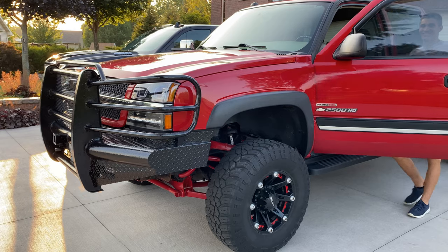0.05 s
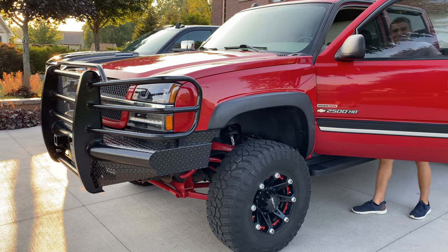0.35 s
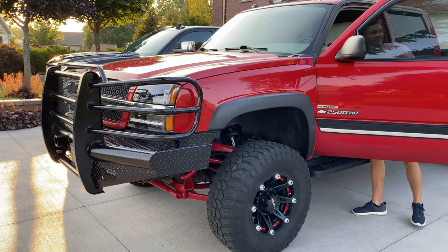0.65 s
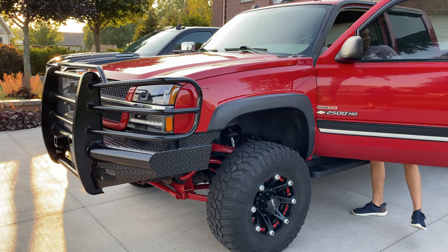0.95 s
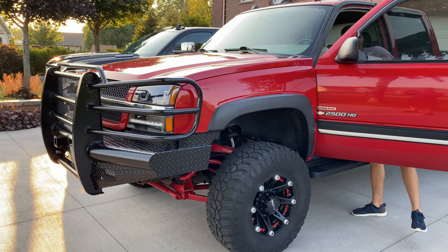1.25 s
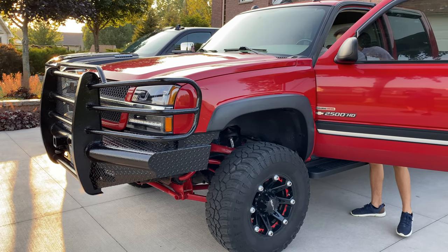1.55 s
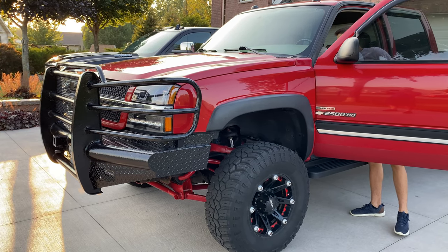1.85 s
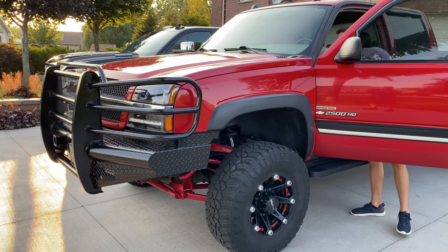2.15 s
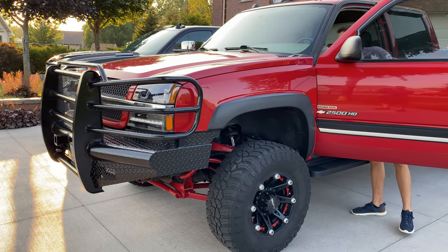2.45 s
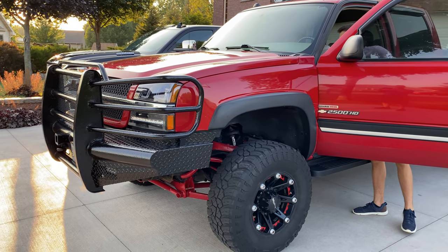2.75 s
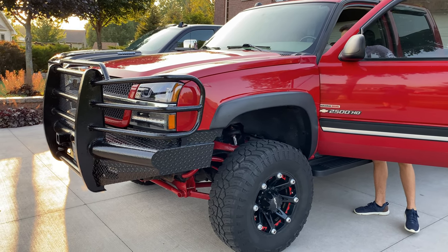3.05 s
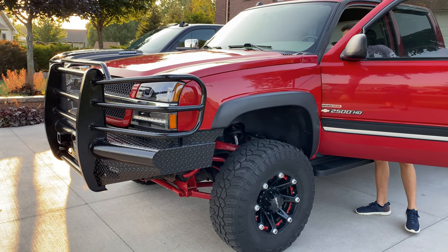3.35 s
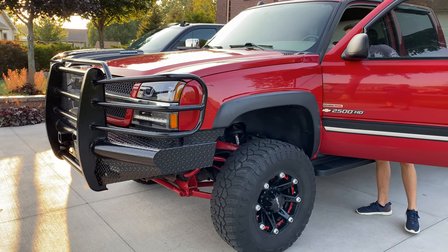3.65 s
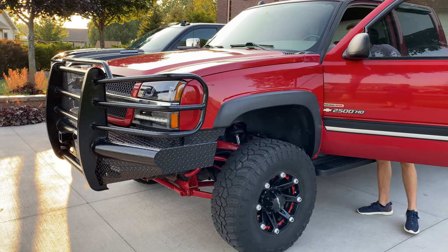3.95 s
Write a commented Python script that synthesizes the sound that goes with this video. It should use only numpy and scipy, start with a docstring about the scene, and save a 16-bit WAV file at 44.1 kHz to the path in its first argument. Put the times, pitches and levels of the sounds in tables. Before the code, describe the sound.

A diesel pickup's starter cranks loudly, but only at the end. First, a quiet driveway with faint bird chirps and distant traffic. Shoes scuff around 0.4 seconds, soft cab bumps follow from 1.3, and keys click near 1.9. A relay clicks at 2.2, a pump whirs briefly at 2.5, then a light breeze puffs. At 3.8 the starter clunks in, clattering and whining, still cranking at 4.

```python
"""A diesel pickup's starter slams into gear and cranks the engine, just before the end.
Its teeth clatter and ring the engine block; the gear growl and motor whine sag on the first
compression and race on after it. Before that, someone steps up to the truck, keys click and a pump
whirs briefly. Behind it all is a quiet driveway with a small bird, a breeze and distant traffic."""
import sys
import numpy as np
from scipy import signal
from scipy.fft import rfft, irfft
from scipy.io import wavfile

SR = 44100
rng = np.random.default_rng(int(sys.argv[2]) if len(sys.argv) > 2 else 0)


def int16_out(signal):
    """Quantize to a 16-bit WAV file."""
    q = np.round(np.clip(np.atleast_2d(signal).T, -1, 1) * 32767)
    wavfile.write(sys.argv[1], SR, q.astype(np.int16))


N = 176400
TIME = np.arange(N) / SR


# The starter's small gear hits the engine's big one. Each row: start in seconds, levels of the ring,
# the crack and the clunk in dB, rise and fade times in seconds.
GEAR_HITS = [(3.768, -24.5, -19.5, -41, 0.0042, 0.019), (3.784, -19.5, -18.5, -16.5, 0.0049, 0.0083),
             (3.809, -27.5, -38, -35, 0.0042, 0.017), (3.939, -24, -33, -32, 0.0043, 0.0077),
             (3.992, -19.5, -23.5, -27, 0.0086, 0.023)]
# The tone of the bright crack and of the dull clunk. Each row: frequency in Hz, level in dB.
CRACK_TONE = [(200, -33), (700, -40), (1400, -2), (2300, 0), (2750, -6), (3200, -14), (4300, -10.5),
              (5600, -18.5), (6800, -5), (8800, -18), (11000, -15), (13300, -25.5), (15000, -14.5)]
CLUNK_TONE = [(220, -14), (290, -7), (420, -20), (530, -10.5), (620, -21), (740, -4.5), (950, -6.5),
              (1300, -20), (1570, -7), (1900, -11.5)]
# The solenoid, an electromagnet, slides the small gear forward.
# Each row: start in seconds, level in dB, rise and fade times in seconds.
GEAR_SLIDE = [(3.751, -41, 0.024, .006)]
# The tone of that slide. Each row: frequency in Hz, level in dB.
SLIDE_TONE = [(200, 0), (900, -17), (2400, 1), (3300, -13), (5200, -22), (6500, -6), (8500, -14),
              (12000, -21)]

def gear_slams():
    """The small gear slides in, hits the big one and takes the load; its chatter rings the block."""
    force = crack = clunk = 0
    for start, ring_db, crack_db, clunk_db, rise, fade in GEAR_HITS:
        shape = burst(start, rise, fade)
        force += from_db(ring_db) * shape
        crack += from_db(crack_db) * shape
        clunk += from_db(clunk_db) * shape
    pole = np.exp(-2 * np.pi * 3500 / SR)  # dulls the chatter above 3500 Hz
    chatter = signal.lfilter([1 - pole], [1, -pole], rng.standard_normal(N))
    crack = crack * unit_power(noise(CRACK_TONE) * from_db(2 * drift(500)))
    clunk = clunk * noise(CLUNK_TONE)
    slide = noise_bursts(GEAR_SLIDE, SLIDE_TONE, grain_db=3.5)
    return engine_block(force * chatter) + crack + clunk + slide


# How fast the starter runs. Each row: time in seconds, whine pitch in Hz, tooth hits per second.
STARTER_SPEED = [(3.79, 1500, 900), (3.815, 2500, 1180), (3.84, 3080, 1215), (3.86, 3420, 1300),
                 (3.88, 3580, 1440), (3.901, 3530, 1432), (3.912, 3500, 1200), (3.93, 3300, 1190),
                 (3.943, 3260, 1005), (3.96, 3280, 1000), (3.97, 3500, 1160), (3.984, 3960, 1400),
                 (4.0, 4130, 1450)]
# How loud it is. Each row: time in seconds, levels of the gear growl, whine and clatter in dB.
STARTER_LEVELS = [(3.785, -55, -50, -43), (3.802, -46, -48, -23.5), (3.814, -37, -34, -29.5),
                  (3.827, -41, -46, -28), (3.84, -25, -57, -29.5), (3.852, -44, -46, -27),
                  (3.874, -40, -37, -44.5), (3.886, -22.5, -37, -27), (3.899, -30, -36, -29),
                  (3.906, -41, -57, -27), (3.918, -26, -40, -27), (3.931, -23.5, -46, -30),
                  (3.945, -30.5, -40, -29), (3.958, -31, -48, -35.5), (3.968, -42, -40, -45),
                  (3.977, -49, -49, -36), (3.987, -45, -33.5, -39), (4.0, -32, -40, -24)]
# The tone the motor's casing gives its brushes and whine. Each row: frequency in Hz, level in dB.
CASING_TONE = [(150, -1), (400, -7), (1000, 7), (2400, 3.5), (4000, -2), (5700, -6), (6500, -5),
               (7250, 5.5), (8300, -20), (10800, -3.5), (13000, -27), (15000, -13)]

def starter_clatter():
    """Uneven tooth hits ring the engine block, over the grind of the motor's brushes."""
    _, tooth_hz = curves(STARTER_SPEED)
    _, _, clatter_db = curves(STARTER_LEVELS)
    running = TIME > STARTER_LEVELS[0][0]
    teeth_passed = np.cumsum(tooth_hz * (1 + .06 * drift(150))) / SR
    hits = np.diff(np.floor(teeth_passed), prepend=0)  # one click per tooth
    hits *= from_db(5 * rng.standard_normal(N))
    noisy_hits = unit_power(hits - hits.mean()) + 1.36 * rng.standard_normal(N)
    clatter = from_db(clatter_db) * unit_power(noisy_hits)
    grind_db = -31.5 + .12 * (clatter_db - clatter_db.max())  # follows the clatter a little
    grind = noise(CASING_TONE) * from_db(grind_db + 1.5 * drift(180))
    return engine_block(running * clatter) + running * grind


def starter_whine():
    """The gear growl swells under load; the motor's whine comes out as it runs free."""
    whine_hz, tooth_hz = curves(STARTER_SPEED)
    gear_db, whine_db, _ = curves(STARTER_LEVELS)
    tooth_hz *= 1 + .008 * drift(220)
    whine_hz *= 1 + .005 * drift(300)
    gear = from_db(gear_db) * rough_tone(tooth_hz, rough=.3, octave_db=-17)
    gear_teeth = 8
    gear *= 1 + .35 * sine(tooth_hz / gear_teeth)  # one throb per turn of the small gear
    octave_db = -9.5 + at_hz(CASING_TONE, 2 * whine_hz)
    whine = from_db(whine_db) * rough_tone(whine_hz, rough=.25, octave_db=octave_db)
    return (TIME > STARTER_LEVELS[0][0]) * (gear + whine)


# The notes the engine block and gear housing ring at. Each row: pitch in Hz, width in Hz, level in dB.
BLOCK_NOTES = [(284, 56, -4), (530, 64, -12.5), (733, 54, 3.5), (858, 47, -1), (984, 31, 7.5),
               (1167, 83, -0.5), (1217, 30, 3), (1480, 33, -2), (1620, 90, -5), (1710, 41, -5),
               (1923, 98, -6), (2120, 110, -3), (2300, 77, -3.5), (2713, 23, -1), (3236, 76, -10),
               (3440, 44, -17), (4770, 95, -15), (5750, 130, -17.5), (7200, 250, -14)]

def engine_block(force):
    """Struck metal rings at many notes at once; white noise would come out at the same power."""
    def ring(push):
        total = 0
        for k, (hz, width, db) in enumerate(BLOCK_NOTES):
            r = np.exp(-np.pi * width / SR)
            feedback = [1, -2 * r * np.cos(2 * np.pi * hz / SR), r * r]
            note = signal.lfilter([1 - r * r, 0, r * r - 1], feedback, push + 1e-18)
            total += (-1) ** k * from_db(db) * note
        return total
    return ring(force) / np.linalg.norm(ring(signal.unit_impulse(SR // 10)))


# The engine rocks. Each row: time in seconds, thud level in dB, housing hum in Hz, hum level in dB.
ROCKING = [(3.78, -60, 288.6, -46), (3.795, -48, 289.7, -44), (3.825, -47, 300.7, -42),
           (3.843, -40, 291.7, -38), (3.856, -46, 305, -40.5), (3.872, -42, 309.7, -38),
           (3.915, -44, 289, -37.5), (3.95, -41, 252, -35.5), (3.972, -48, 264, -44.5),
           (4.0, -41, 269, -48)]
# The tone of the thuds. Each row: frequency in Hz, level in dB.
THUD_TONE = [(25, -22), (55, -6.5), (90, -3), (150, -14), (220, -15.5), (400, -27)]
# Compression thumps. Each row: start in seconds, pitch in Hz, level in dB, rise and fade in seconds.
MOUNT_THUMPS = [(3.82, 140, -27, .005, .008), (3.834, 90, -33, .01, .025), (3.868, 135, -35, .005, .015),
                (3.89, 105, -38, .004, .012), (3.955, 74, -32, .015, .02)]

def engine_rocking():
    """The engine thuds and hums as it is dragged round; each compression thumps its mounts."""
    thud_db, hum_hz, hum_db = curves(ROCKING)
    hum = from_db(hum_db) * rough_tone(hum_hz, rough=.35, octave_db=-11)
    thuds = from_db(thud_db) * noise(THUD_TONE)
    thumps = sum(from_db(db) * burst(start, rise, fade) * np.sin(2 * np.pi * hz * (TIME - start))
                 for start, hz, db, rise, fade in MOUNT_THUMPS)
    return (TIME > ROCKING[0][0]) * (thuds + hum) + thumps


def engine_bay(sound, echo_db, side_db):
    """Sound bounces off the engine bay and the concrete; the total power stays about the same."""
    reflections = from_db(echo_db) * echo(sound, seconds=.12, side_db=side_db)
    return (sound + reflections) / np.hypot(1, from_db(echo_db))


# The driver's movements. Each row: start in seconds, level in dB, rise and fade times in seconds.
SHOE_SCUFFS = [(.322, -54, 0.004, 0.041), (.348, -56.5, 0.0056, 0.013), (.48, -61, 0.016, 0.073),
               (.54, -65, 0.013, 0.045)]
CAB_BUMPS = [(1.29, -53.5, 0.009, 0.027), (1.625, -60, 0.0052, 0.018), (1.675, -59, 0.008, 0.018),
             (1.89, -55.5, 0.0077, 0.034), (1.968, -46.5, 0.0022, 0.023)]
COLUMN_KNOCKS = [(1.905, -46, 0.0061, 0.023)]
KEY_CLICKS = [(1.903, -59.5, 0.0042, 0.054), (1.966, -51.5, 0.0051, 0.017), (2.0, -55.5, 0.0048, 0.015),
              (2.695, -60, 0.0033, 0.018)]
# The tone of each movement. Each row: frequency in Hz, level in dB.
SCUFF_TONE = [(200, 7.5), (700, -3), (1800, 0.5), (2700, -3), (3700, -0.5), (5500, -11), (6700, 0),
              (8700, -15), (10500, -6), (15000, -17)]
BUMP_TONE = [(100, 2), (250, -3), (400, -8.5), (550, -1.5), (800, -0.5), (1200, -9), (2000, -13),
             (4000, -16), (9000, -30)]
KNOCK_TONE = [(240, -22), (296, 2), (380, -13), (490, -13), (549, 10), (620, -2), (760, -9), (883, -14),
              (1000, -10), (1400, -15)]
KEY_TONE = [(800, -29), (2200, 11), (3300, -27), (3600, 12), (3850, 10), (4250, -2), (4900, 1), (5800, -9),
            (7000, 4), (8700, -16), (11000, -4.5), (15000, -46)]

def driver():
    """Shoes on concrete, soft bumps in the cab, a hollow steering column knock and keys in the lock."""
    steps = noise_bursts(SHOE_SCUFFS, SCUFF_TONE, grain_db=2)
    bumps = noise_bursts(CAB_BUMPS, BUMP_TONE, grain_db=1)
    knock = noise_bursts(COLUMN_KNOCKS, KNOCK_TONE)
    keys = noise_bursts(KEY_CLICKS, KEY_TONE, grain_db=2)
    return steps + bumps + knock + keys


# The relay's click and the pump's surges.
# Each row: start in seconds, level in dB, rise and fade times in seconds.
RELAY_CLICK = [(2.166, -57.5, 0.0028, 0.094)]
PUMP_SURGES = [(2.438, -46.5, 0.021, 0.044), (2.492, -52, 0.029, 0.055), (2.565, -53, 0.025, 0.027),
               (2.625, -55.5, 0.02, 0.051)]
# The tone of each. Each row: frequency in Hz, level in dB.
RELAY_TONE = [(1300, -14), (2100, 5), (2600, 0), (3100, -1), (3700, 1), (4400, 0), (4900, 7), (5500, -9),
              (7000, -16), (12000, -25)]
PUMP_TONE = [(70, 8), (130, 11), (190, 12.5), (250, 5), (350, -14.5), (530, -1.5), (670, -10), (790, 10),
             (920, -9), (1350, -7), (1560, 3), (1800, -10), (2100, -2), (2700, -20.5), (5000, -18.5),
             (12000, -36)]

def relay_and_pump():
    """With the ignition on, a relay (an electric switch) clicks and rings, then the pump primes."""
    relay = noise_bursts(RELAY_CLICK, RELAY_TONE, grain_db=1.5)
    return relay + noise_bursts(PUMP_SURGES, PUMP_TONE, grain_db=1)


# The bird's notes. Each row: start and length in seconds, first, middle and last pitch in Hz,
# level in dB, huskiness as a share of the pitch.
BIRD_NOTES = [(0.098, 0.075, 4100, 3520, 3070, -71, .04), (0.824, 0.055, 3210, 3520, 3800, -72.5, 0.04),
              (0.876, 0.034, 3700, 3250, 3050, -66, 0.041), (0.896, 0.032, 3720, 4170, 4320, -61.5, .005),
              (0.914, 0.019, 3760, 3810, 3780, -63, .005), (1.012, 0.042, 3780, 3920, 3220, -66.5, 0.014),
              (1.064, 0.028, 3200, 2990, 2780, -70, .04), (1.256, 0.057, 3000, 3200, 3000, -73, .09),
              (1.796, 0.076, 4200, 3910, 3200, -73, .07), (2.361, 0.081, 3700, 3210, 2700, -69, .09),
              (2.8, 0.053, 4280, 4120, 3630, -70.5, 0.054), (2.847, 0.04, 3400, 3200, 2850, -68.5, 0.11),
              (3.717, .04, 3920, 3800, 3520, -68.5, .03)]

def bird():
    """A small bird sings thin gliding notes, some clear and some husky, and the garden echoes them."""
    song, waver = np.zeros(N), drift(710)
    for start, length, first_hz, middle_hz, last_hz, db, husk in BIRD_NOTES:
        on = (TIME > start) & (TIME < start + length)
        progress = (TIME[on] - start) / length
        glide = np.polyfit([0, .5, 1], [first_hz, middle_hz, last_hz], 2)
        hz = np.polyval(glide, progress) * (1 + husk * waver[on])
        song[on] += from_db(db) * np.sqrt(2 * np.sin(np.pi * progress)) * sine(hz)
    return song + from_db(-1) * echo(song, seconds=.18, side_db=0)


# The tone of the open air and of the traffic. Each row: frequency in Hz, level in dB.
AIR_TONE = [(88, -39), (150, -2), (255, -7.5), (375, -11.5), (434, -12), (562, -12.5), (662, -7), (921, -9),
            (1030, -7), (1480, -12.5), (2770, -21.5), (4890, -23.5), (6090, -30.5), (6670, -22),
            (8630, -38.5), (9990, -30.5), (12000, -42), (15600, -76), (22000, -120)]
TRAFFIC_TONE = [(33, -20), (42, 11), (52, 2), (68, 10), (88, 5), (115, 4), (160, -12.5), (260, -33)]
# How the traffic swells and dips. Each row: time in seconds, level in dB.
TRAFFIC_LEVELS = [(0.1, -54.5), (0.19, -53), (0.77, -57.5), (0.84, -49), (0.87, -52), (1.69, -55.5),
                  (2.35, -51.5), (2.41, -58), (2.51, -46.5), (2.53, -51.5), (2.88, -51), (3.04, -55),
                  (3.14, -72), (3.16, -56.5), (3.36, -47), (3.39, -53.5), (3.69, -51), (3.72, -56.5)]

def air_and_traffic():
    """Open air and far-off traffic reach the left ear first and are slightly louder in the right."""
    traffic_db, = curves(TRAFFIC_LEVELS)
    air = from_db(-57 + .5 * drift(6.8)) * noise(AIR_TONE)
    left, right = air + from_db(traffic_db) * noise(TRAFFIC_TONE)
    late_right = np.interp(TIME - .00045, TIME, right)
    return np.array([left, late_right]) * ear_gains(left_minus_right_db=-.9)


# Puffs of breeze. Each row: start in seconds, level in dB, rise and fade times in seconds.
BREEZE_PUFFS = [(2.58, -46.5, 0.034, 0.092), (2.85, -46.5, 0.069, 0.11), (2.96, -44, 0.069, 0.036),
                (3.29, -44, 0.039, .05)]
# The tone of the breeze and of the hiss. Each row: frequency in Hz, level in dB.
BREEZE_TONE = [(30, -8), (45, 0), (70, -1), (100, -8), (140, -20)]
HISS_TONE = [(3000, -21), (5000, 1), (7000, -6.5), (8700, -12), (9900, 1), (11000, -5.5), (13400, -6.5),
             (14800, 3.5), (16000, -29)]
# How the hiss fades. Each row: time in seconds, level in dB.
HISS_FADE = [(0.1, -73), (1.4, -73), (2.1, -76), (3.0, -79), (3.7, -90)]

def breeze_and_hiss():
    """The breeze comes in low, soft puffs while a thin hiss fades away."""
    hiss_db, = curves(HISS_FADE)
    return noise_bursts(BREEZE_PUFFS, BREEZE_TONE) + from_db(hiss_db) * noise(HISS_TONE)


# How alike the two ears hear a noise. Each row: frequency in Hz, likeness from 0 (unrelated) to 1 (same).
EAR_LIKENESS = [(30, 0.034), (70, 0.62), (150, 0.85), (300, 0.66), (600, 0.6), (1200, 0.32), (3000, 0.095),
                (12000, 0.013)]

def noise(tone):
    """Stereo noise of power 1, shaped by a tone table and falling away past the table's ends."""
    hz = np.maximum(np.arange(N // 2 + 1) * SR / N, 1)
    edges = 1 / np.sqrt((1 + (tone[0][0] / hz) ** 8) * (1 + (hz / tone[-1][0]) ** 8))
    mid, side = rfft(rng.standard_normal((2, N))) * from_db(at_hz(tone, hz)) * edges
    alike = at_hz(EAR_LIKENESS, hz)
    return unit_power(irfft(np.sqrt(1 + alike) * mid + np.sqrt(1 - alike) * side * [[1], [-1]], N))


def noise_bursts(rows, tone, grain_db=0):
    """Short bursts of noise; grain makes their level flutter, like a rub or a rattle."""
    level = sum(from_db(db) * burst(start, rise, fade) for start, db, rise, fade in rows)
    return level * unit_power(noise(tone) * from_db(grain_db * drift(310)))


def burst(start, rise, fade):
    """A level that climbs in a straight line, then dies away."""
    return np.clip((TIME - start) / rise, 0, 1) * np.exp(-np.maximum(TIME - start - rise, 0) / fade)


def rough_tone(hz, rough, octave_db):
    """A note and the octave above it, each shivering in strength."""
    note = sine(hz) * (1 + rough * drift(76))
    octave = sine(2 * hz) * (1 + rough * drift(76))
    return np.sqrt(2) * (note + from_db(octave_db) * octave)


def sine(hz):
    """A pure tone that follows a changing pitch."""
    return np.sin(2 * np.pi * np.cumsum(hz) / SR)


def echo(sound, seconds, side_db):
    """Dense reflections that fall 60 dB in the given time; more side_db makes them wider."""
    mid, side = rng.standard_normal((2, SR // 2)) * from_db(-60 * TIME[:SR // 2] / seconds)
    tail = mid + from_db(side_db) * side * [[1], [-1]]
    tail /= np.sqrt(np.sum(tail ** 2) / 2)
    return signal.fftconvolve(np.atleast_2d(sound), tail, axes=1)[:, :N]


def drift(rate_hz):
    """A smooth random wobble of power 1; a higher rate wobbles faster."""
    r = np.exp(-2 * np.pi * rate_hz / SR)
    return unit_power(signal.lfilter([1], [1, -2 * r, r * r], rng.standard_normal(N + SR))[SR:])


def curves(rows):
    """Join a table's points in time with straight lines, one curve per column."""
    seconds, *columns = np.transpose(rows)
    return [np.interp(TIME, seconds, column) for column in columns]


def at_hz(rows, hz):
    """Read a table at any frequency, with octaves evenly spaced."""
    row_hz, values = np.transpose(rows)
    return np.interp(np.log(hz), np.log(row_hz), values)


def ear_gains(left_minus_right_db):
    """Split a level difference evenly between the two ears."""
    return from_db(left_minus_right_db * np.array([[.5], [-.5]]))


def from_db(db):
    """Turn decibels into a multiplier."""
    return 10 ** (np.asarray(db) / 20)


def unit_power(sound):
    """Scale a sound to an average power of 1."""
    return sound / np.sqrt(np.mean(sound ** 2) + 1e-20)


# Which side the truck is heard on. Each row: frequency in Hz, left level minus right level in dB.
TRUCK_BALANCE = [(60, -2.5), (200, -3), (700, -1), (1300, 0.5), (2400, -3.5), (4400, 2.5), (8000, -2.5),
                 (15000, 2.5)]

def scene():
    """The truck sounds a little to the right, over the quiet driveway."""
    metal = engine_bay(gear_slams() + starter_clatter(), echo_db=-1, side_db=-4)
    whine = engine_bay(starter_whine(), echo_db=-11, side_db=5)
    truck = metal + whine + engine_rocking() + driver() + relay_and_pump()
    hz = np.maximum(np.arange(N + 1) * SR / (2 * N), 1)
    truck = irfft(ear_gains(at_hz(TRUCK_BALANCE, hz)) * rfft(truck, 2 * N))[:, :N]
    return truck + air_and_traffic() + breeze_and_hiss() + bird()


def record(dry):
    """The sound begins after a moment of silence, and the treble above 15800 Hz is cut."""
    fade_in = np.clip((TIME - .083) / .003, 0, 1)
    treble_cut = signal.ellip(10, .2, 80, 15800, fs=SR, output="sos")
    return signal.sosfilt(treble_cut, dry * fade_in)


dry = scene()
out = record(dry)
int16_out(out)
```